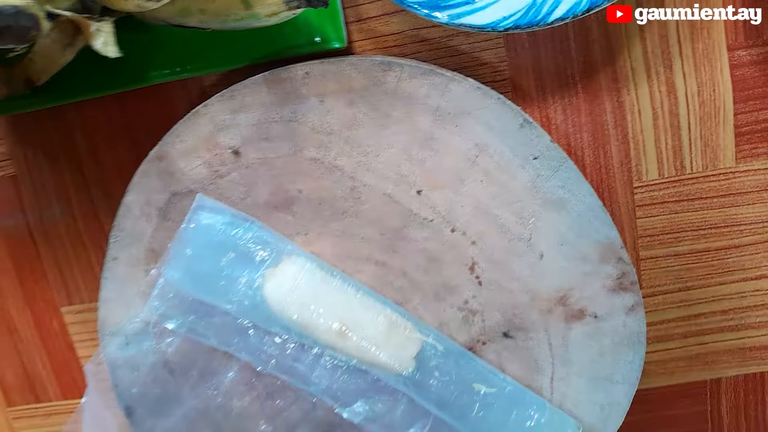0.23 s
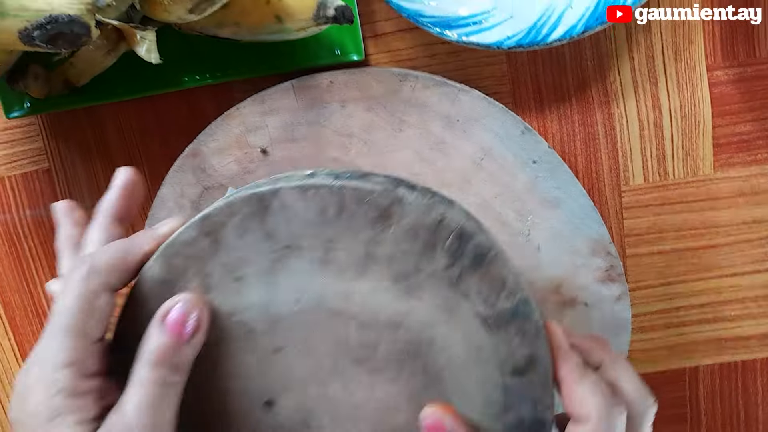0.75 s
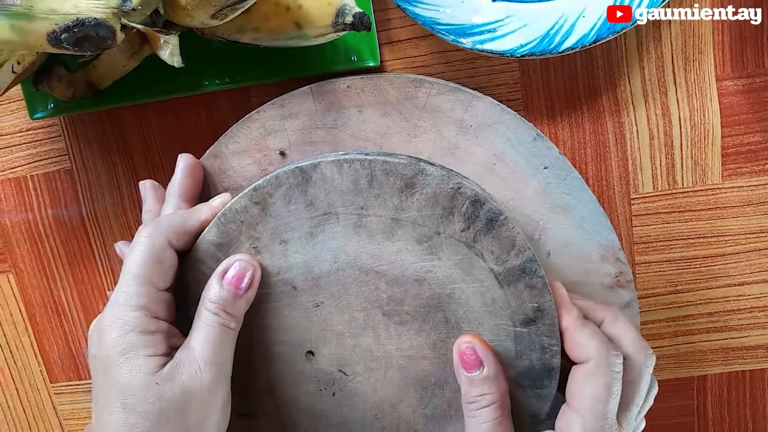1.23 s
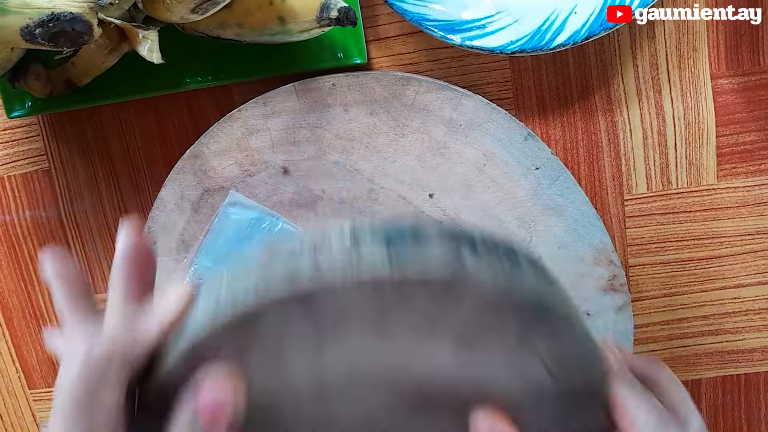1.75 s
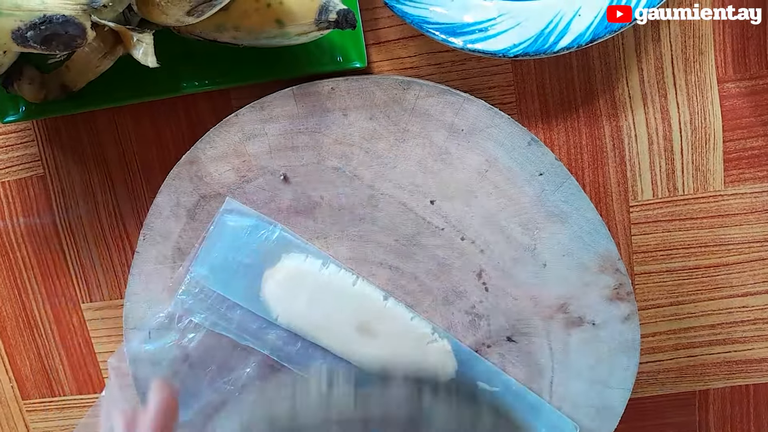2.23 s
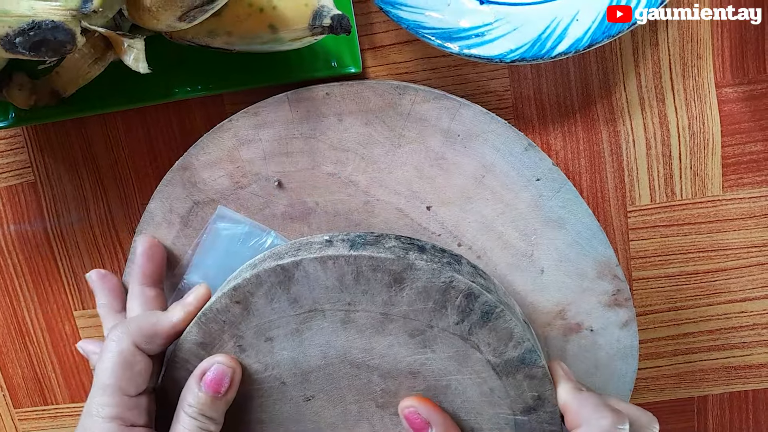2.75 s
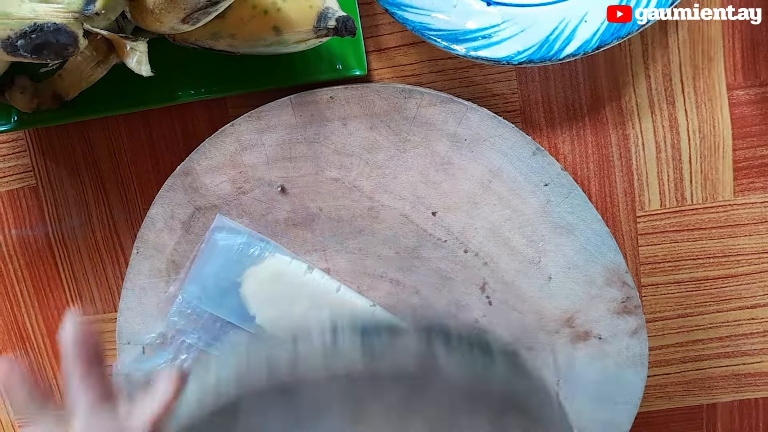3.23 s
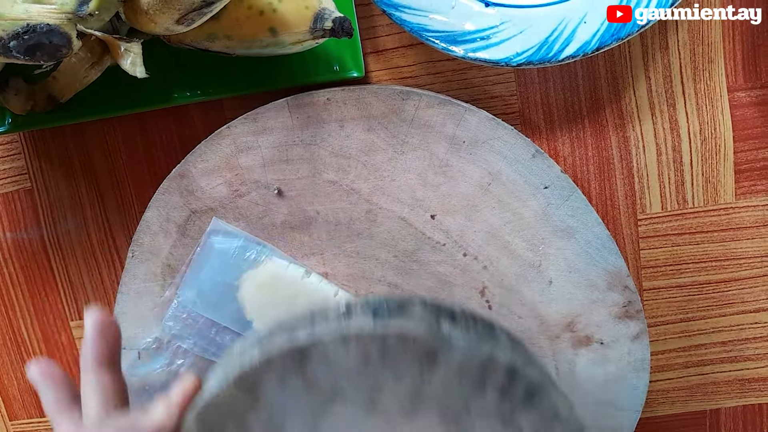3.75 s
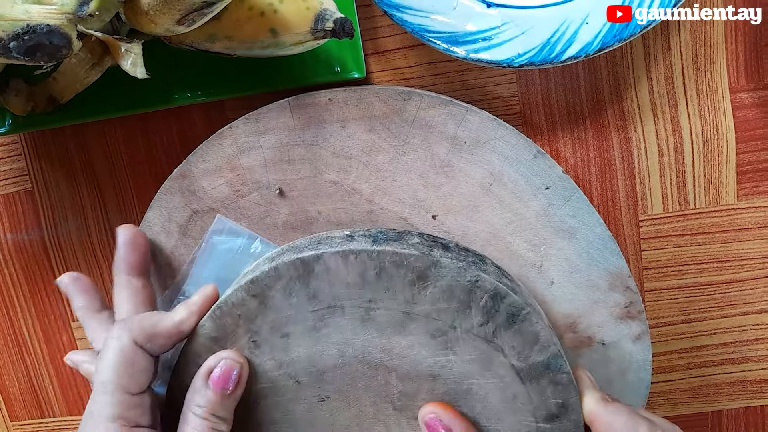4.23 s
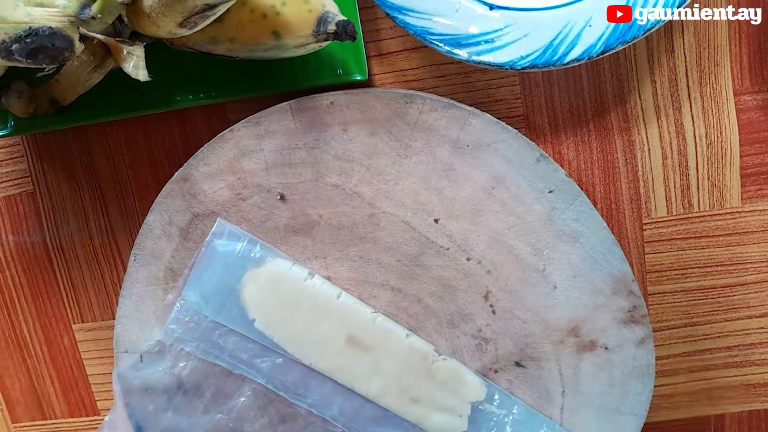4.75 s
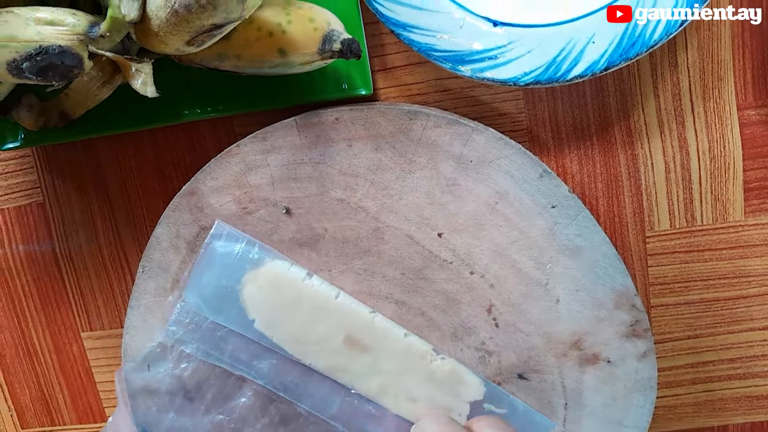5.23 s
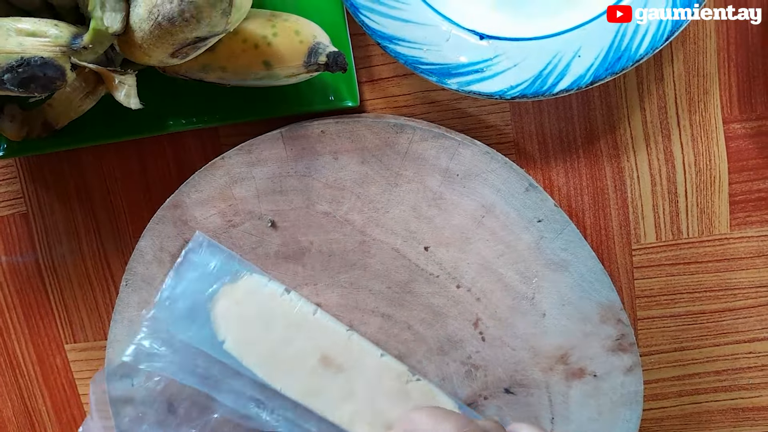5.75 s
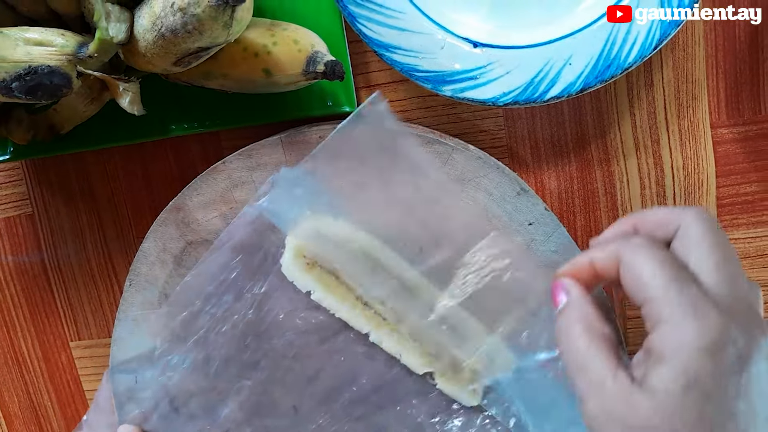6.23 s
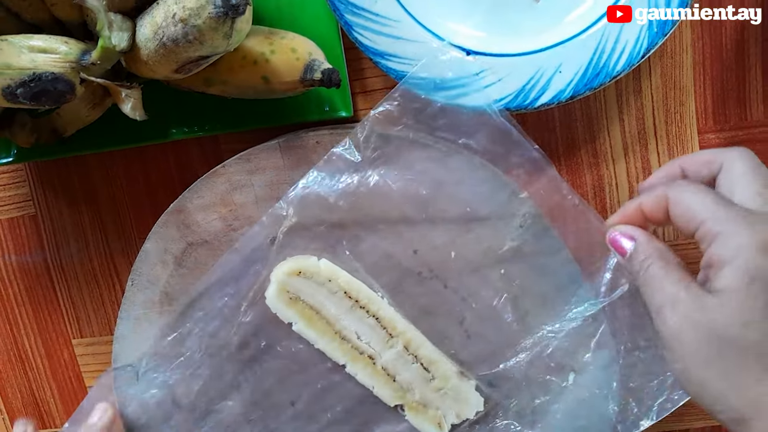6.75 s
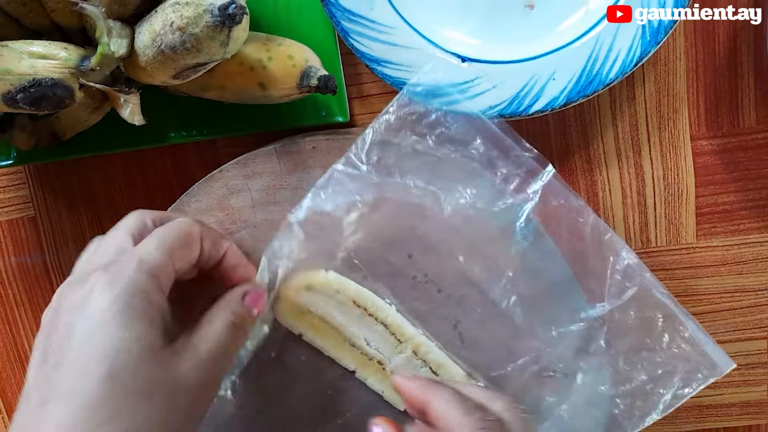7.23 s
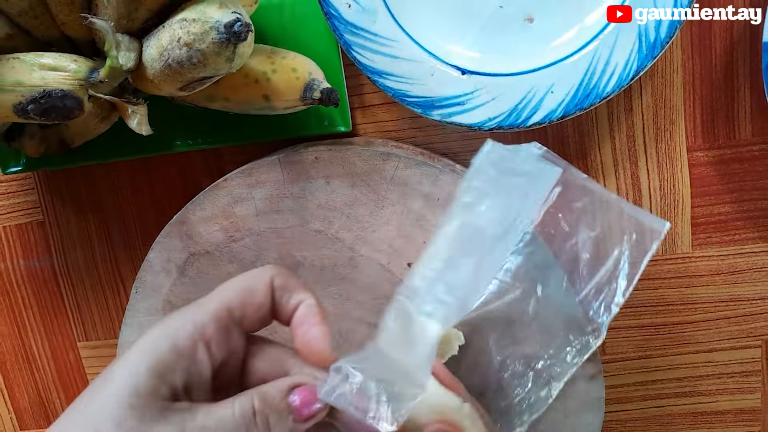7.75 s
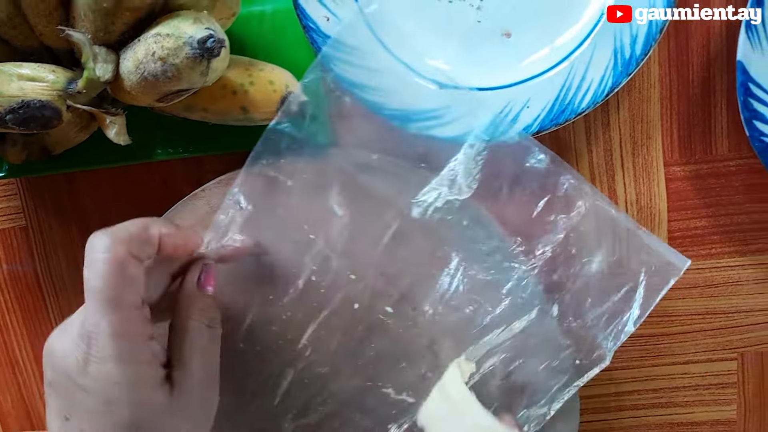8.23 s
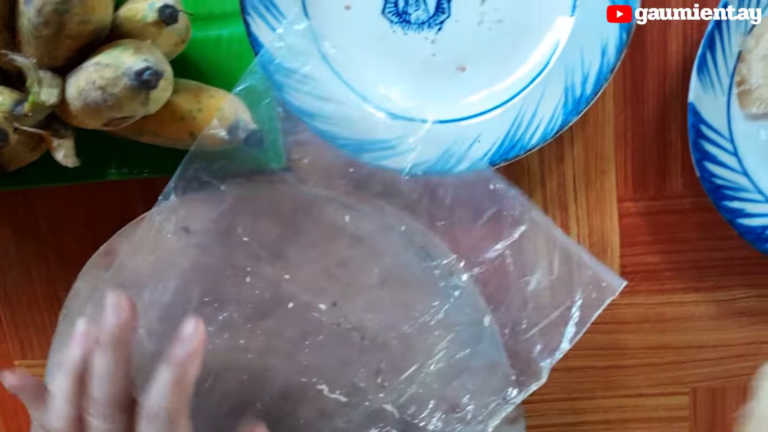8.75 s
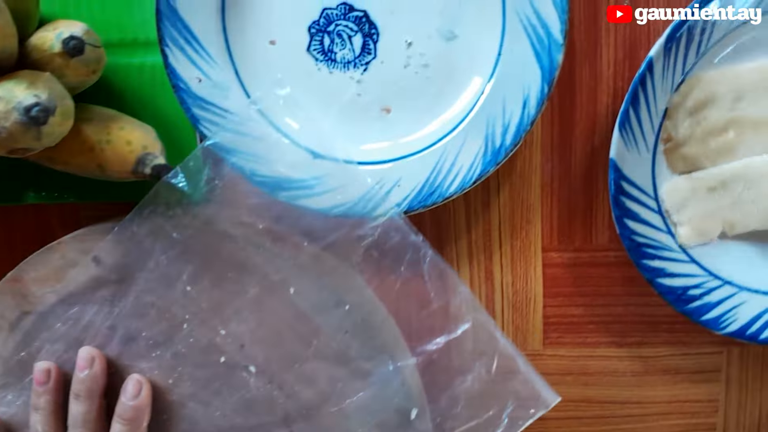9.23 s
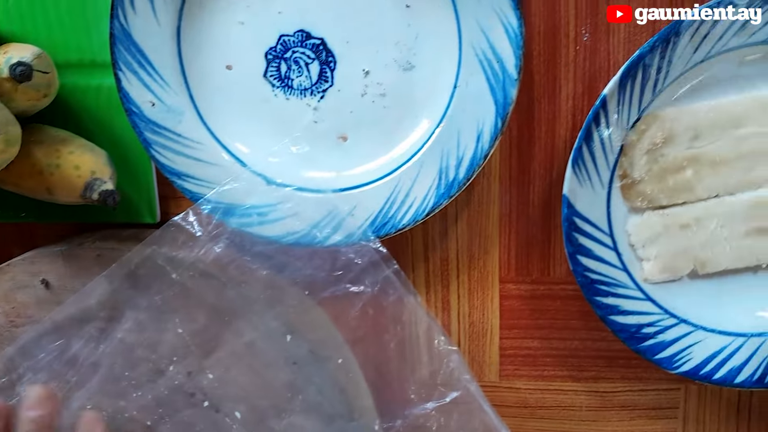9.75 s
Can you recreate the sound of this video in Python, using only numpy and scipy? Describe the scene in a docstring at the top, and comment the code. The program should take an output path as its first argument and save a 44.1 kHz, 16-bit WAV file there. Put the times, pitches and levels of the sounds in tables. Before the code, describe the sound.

Near-silent room air with a far bird's thin rising whistle. Three soft presses of a board on a wrapped banana give dull bumps, sparse plastic ticks and small wet squelches. Then the board is set down with one startlingly loud, dry wood clack, rocking briefly. Bright plastic film crackles in irregular bursts as hands open and peel it, and finally almost nothing remains. Close, dry stereo pickup with short room echo.

```python
"""A kitchen floor, two microphones close by: a banana lies in a thin plastic sheet between two wooden boards.
First come light taps and creases, modelled as short noise bursts; noise swelling through a resonance is the
plastic rubbing, and far outside a bird repeats a thin rising whistle. The upper board presses three times, in
showers of clicks, thuds and wet pops, then lands with a knock of ringing modes that overloads the converter.
Last the sheet is folded open and peeled off the fruit, crinkling, over quiet coloured noise for the air."""
import sys
import numpy as np
from scipy import signal
from scipy.fft import rfft, irfft, next_fast_len
from scipy.io import wavfile
from scipy.ndimage import uniform_filter1d

SR = 44100
rng = np.random.default_rng(int(sys.argv[2]) if len(sys.argv) > 2 else 0)


def bounce(signal):
    """Save signal as a 16-bit WAV file at the path given by the first command-line argument."""
    frames = np.transpose(np.atleast_2d(signal))
    limited = np.clip(frames, -1, 1)
    pcm = np.round(limited * 32767).astype(np.int16)
    wavfile.write(sys.argv[1], SR, pcm)


N = 440558

# Levels are relative: each source still passes through its own gains below.
# still air of the kitchen: (frequency [Hz], level per Hz [dB])
AIR_SPECTRUM = [(25, -27), (62, -5), (87, -12), (175, -9.5), (300, -17), (420, -24.5), (900, -32),
                (2000, -35), (5500, -40.5), (10500, -41), (12500, -38), (16000, -41)]
# how alike noise is at the two microphones: (frequency [Hz], left-right correlation [0-1])
MIC_LIKENESS = [(100, 0.71), (300, .8), (700, 0.45), (1200, 0.25), (2200, .25), (5000, 0.15)]
# echoes off the kitchen walls: (frequency [Hz], decay by 60 dB [s])
KITCHEN_DECAY = [(120, 0.19), (500, 0.24), (2000, 0.2), (6000, 0.15), (15000, 0.2)]
# dull thud of boards and fruit: (frequency [Hz], level per Hz [dB])
THUD_SPECTRUM = [(40, -15.5), (90, -6), (160, 4.5), (270, -3), (420, -16), (800, -40.5), (4000, -78)]
# the board presses the fruit:
# (touch [s], lying flat [s], lifting off [s], crackle level [dB], ring of the trapped fold [Hz])
BOARD_PRESSES = [(1.02, 1.18, 1.645, -47.2, 1750), (2.57, 2.77, 3.16, -46, 1850),
                 (4.01, 4.185, 4.328, -47.2, 2500)]
# hands move the sheet:
# (start [s], end [s], level halfway [dB], swell from start to end [dB], ring of the flexing fold [Hz])
HAND_RUSTLES = [(5.429, 5.5, -57.5, 0, 3204), (5.66, 6.09, -49, 4, 2500), (6.07, 6.543, -38.6, 12, 2800),
                (6.626, 6.856, -54, -8.5, 1370), (7.178, 7.353, -38, 12, 2620),
                (7.41, 7.655, -36.5, -0.5, 1470), (7.685, 7.76, -44, 8, 1980),
                (7.885, 8.11, -37.5, -9.5, 1430), (8.14, 8.577, -52.5, 4, 2120),
                (8.89, 8.953, -46, -10, 1780)]
# crisp plastic: (frequency [Hz], level per Hz [dB])
SHEET_SPECTRUM = [(200, -9), (500, 3.5), (900, -3.5), (2700, -8.5), (6500, -13.5), (9000, -16.5),
                  (16000, -20.5)]
# loudest creases snapping through: (time [s], peak level [dB], ring of the buckling facet [Hz])
CREASE_SNAPS = [(0.0214, -32.5, 3050), (1.1372, -29.5, 1680), (1.1648, -24.5, 1920), (1.6769, -23, 1100),
                (2.7082, -23, 1310), (3.2326, -23, 1230), (3.2591, -20, 1790), (4.1119, -24.5, 2220),
                (4.353, -26, 3900), (4.394, -23.5, 1990), (5.7394, -28, 2540), (6.0763, -15, 2880),
                (6.2115, -30, 3030), (6.3012, -16, 3960), (6.3171, -12, 3020), (6.3989, -18.5, 2800),
                (6.4208, -17, 3780), (6.4343, -10, 4000), (6.499, -21, 4290), (6.5303, -21, 4520),
                (6.8175, -31, 2750), (7.1508, -27.5, 7750), (7.1732, -22.5, 5830), (7.1894, -19, 3300),
                (7.214, -16.5, 5110), (7.226, -19, 3220), (7.2659, -13, 5360), (7.2813, -12, 8850),
                (7.3379, -18.5, 2710), (7.3795, -28, 3200), (7.5276, -19.5, 2320), (7.554, -16, 2700),
                (7.6147, -16.5, 2720), (7.6812, -24, 2600), (7.697, -19.5, 3000), (7.739, -17, 4140),
                (7.814, -12, 5000), (7.8449, -20, 3100), (7.887, -24, 2420), (7.9148, -17.5, 2740),
                (8.0643, -15, 1990), (8.1556, -16.5, 2070), (8.234, -25.5, 1900), (8.3918, -30.5, 2770),
                (8.903, -26, 2999), (9.715, -24.5, 13000)]
# film ringing over the air beneath it: (frequency [Hz], width [Hz], level [dB])
FILM_RINGS = [(892, 190, -1.5), (2840, 380, -4)]
# dry blows on the boards, light taps to the landing: (time [s], peak level [dB], upper edge [Hz])
BOARD_KNOCKS = [(.021, -25.5, 1080), (0.055, -27.5, 1090), (4.018, -22, 142), (5.1896, -6, 500),
                (5.206, -5.5, 540), (5.541, -14.5, 420), (5.5497, 14, 2596), (5.5587, 7.5, 1000)]
# modes of the board on the floor: (frequency [Hz], level [dB])
BOARD_MODES = [(114, -12), (150, -4.5), (234, -2.5), (295, -10), (373, -5.5), (414, -12), (501, 2),
               (605, -14), (899, -1), (1011, -6), (1167, -13.5), (1421, 0.5), (1594, -12), (2252, -7)]
# noisy clack of wood on wood: (frequency [Hz], level per Hz [dB])
CLACK_SPECTRUM = [(80, -13.5), (400, 4.5), (1100, -5.5), (3000, -9.0), (12000, -17)]
# smooth rubbing and hissing of the plastic as it drags, peels or slides:
# (start [s], end [s], level [dB], ring [Hz], ring share [dB], treble share [dB])
SHEET_RUBS = [(0.309, 0.542, -48, 3970, -10, -1.5), (0.459, 0.667, -62, 4500, 7, -1),
              (3.199, 3.564, -53, 1660, -1, -5), (5.18, 5.316, -56.5, 3000, -12, 1.5),
              (6.198, 6.663, -42.5, 700, -15, -17), (6.571, 6.92, -53.5, 1065, 13, -16),
              (7.382, 8.2, -47, 840, 1, -19), (8.885, 9.12, -56.5, 3800, -8, 3.5),
              (9.049, 9.724, -69, 8400, -2, 7.5)]
# bird calls: (time [s], level [dB])
BIRD_CALLS = [(0.771, -57), (2.248, -54.5), (4.032, -52.5), (6.619, -56.5), (9.146, -55)]
# shape of one call: (time after its start [s], pitch before the waver [Hz], level [dB])
CALL_SHAPE = [(0, 4070, -9.5), (.045, 4690, 2.5), (0.085, 5320, 7.5), (.15, 6350, -2.5), (.19, 6500, -8)]
# soft bumps of board or hand: (time [s], thud level [dB])
SOFT_BUMPS = [(1.168, -36.5), (1.662, -22), (1.752, -33), (2.826, -28), (3.18, -25), (3.258, -27.5),
              (4.339, -24), (4.415, -26), (6.082, -24.5)]
# the fruit gives way in wet pops: (time [s], gap between pops [s], first level [dB], growth per pop [dB])
FRUIT_SQUASHES = [(1.443, 0.024, -30, 0.3), (2.901, 0.03, -35.5, 1.44), (4.155, 0.028, -33.5, -9)]
# wet squelch of the fruit: (frequency [Hz], level per Hz [dB])
SQUELCH_SPECTRUM = [(200, -29), (550, 0.5), (720, -3.5), (1050, -3), (1450, -15), (3000, -20), (6000, -37)]

AIR_DB = -54
EDGE_HZ = 15950  # upper band limit
# treble share at a middling facet, and its change with pitch: smaller facets and folds are brighter
FACET_HZ = 2590
SNAP_TREBLE_DB, SNAP_DB_PER_OCTAVE = -4, 6
RUSTLE_TREBLE_DB, RUSTLE_DB_PER_OCTAVE = -7.5, 2
# under a press: crackle grows as the board comes down, sinks under the load, unsticks at the lift
LAY_SWELL_DB, LOADED_DB = 3, -10.5
LIFT_S, LIFT_DB = 0.1, 3
# rumble of weight building up on the boards
LEAN_DB, LEAN_SWELL_DB, LEAN_RELEASE_S = -42.5, 9.5, 0.56
# faint rumble of handling, until the hands come to rest
HANDS_DB, HANDS_REST_S, HANDS_FADE_DB_PER_S = -55, 8.3, 14.5
# the landed board rocks: each rock comes sooner and weaker
ROCK_START_S, ROCK_DB, ROCK_EDGE_HZ = 5.578, 0, 560
ROCK_GAP_S, ROCK_SHRINK, ROCK_LOSS_DB = 0.016, 0.5, 3.5


def gain_of(db):
    """Decibels to amplitude."""
    return 10 ** (np.asarray(db) / 20)


def evened(x):
    """Scales to rms 1."""
    return x / np.sqrt(np.mean(x ** 2) + 1e-20)


def peaked(x):
    """Scales so that the crest of a short burst is about 1."""
    power = uniform_filter1d((x ** 2).mean(0), size=24)
    return x / np.sqrt(2 * power.max() + 1e-20)


def read(points, hz):
    """Reads a table on a log-frequency axis."""
    f, value = np.transpose(points)
    return np.interp(np.log(hz + 1), np.log(f + 1), value)


def add(mix, s, sound):
    """Adds a stereo sound at time s, cut off at the end of the scene."""
    start = max(round(s * SR), 0)
    part = mix[:, start:][:, :sound.shape[1]]
    part += sound[:, :part.shape[1]]


def cut(x, hz, kind, order=2):
    """Low-pass or high-pass."""
    sos = signal.butter(order, np.clip(hz, 10, SR * .48), kind, fs=SR, output="sos")
    return signal.sosfilt(sos, x)


def ring(x, hz, width):
    """A resonance of gain 1 at its centre."""
    hz = min(hz, SR * .45)
    return signal.lfilter(*signal.iirpeak(hz, hz / width, fs=SR), x)


def noise(spectrum, size):
    """Coloured noise at two microphones, more alike in the bass than in the treble."""
    hz = np.fft.rfftfreq(size, 1 / SR)
    shared, apart = rfft(rng.standard_normal((2, size)))
    same = np.clip(read(MIC_LIKENESS, hz), 0, 1)
    mid, side = np.sqrt(1 + same) * shared, np.sqrt(1 - same) * apart
    left_right = np.array([mid + side, mid - side])
    return evened(irfft(left_right * gain_of(read(spectrum, hz)), size))


def burst(spectrum, rise, t60, size=4096):
    """Many close modes struck at once: noise that rises and dies away."""
    t = np.arange(size) / SR
    envelope = (1 - np.exp(-t / rise)) * gain_of(-60 * t / t60)
    return peaked(noise(spectrum, size) * envelope)


def level(points):
    """A dB curve over time as a gain for the whole scene, -120 dB outside its span."""
    times, db = np.transpose(points)
    return gain_of(np.interp(np.arange(N) / SR, times, db, -120, -120))


def fold(x, hz, treble_db, ring_db, width):
    """Colours crackle by the size of the fold: a ring, little below it, and fizz on top."""
    body = cut(x, max(6000, hz), "low", order=3)
    body = evened(cut(body, .5 * hz, "high"))
    body = evened(body + gain_of(ring_db) * evened(ring(x, hz, width * hz)))
    fizz = evened(cut(x, max(6000, hz * 0.81), "high", order=3))
    return body + gain_of(treble_db) * fizz


def still_air():
    """The quiet of the place: steady coloured noise."""
    return gain_of(AIR_DB) * noise(AIR_SPECTRUM, N)


def kitchen(x, delay=0.0074):
    """Wall echoes: noise that builds up over the delay, each band dying at its own speed."""
    flat = noise([(20, 0), (20000, 0)], size=SR // 2)
    hz, t, z = signal.stft(flat, SR, nperseg=256)
    decay = gain_of(-60 * t / read(KITCHEN_DECAY, hz)[:, None])
    tail = signal.istft(z * decay, SR, nperseg=256)[1]
    tail *= np.minimum(np.arange(tail.shape[1]) / SR / delay, 1) ** 2
    return signal.fftconvolve(x, tail / np.linalg.norm(tail[0]), axes=1)[:, :N]


def leaning(let_go_db=-24, tug_db=-10):
    """Weight builds through each press and lets go after the lift; handling and tugs rumble too."""
    resting = np.maximum(np.arange(N) / SR - HANDS_REST_S, 0)
    weight = gain_of(HANDS_DB - HANDS_FADE_DB_PER_S * resting)
    for touch, _, lift, _, _ in BOARD_PRESSES:
        free = lift + LIFT_S
        press = [(touch, LEAN_DB - LEAN_SWELL_DB), (lift, LEAN_DB),
                 (free, LEAN_DB), (free + LEAN_RELEASE_S, LEAN_DB + let_go_db)]
        weight = np.maximum(weight, level(press))
    for start, end, db, _, _ in HAND_RUSTLES:
        tug = [(start, db + tug_db), (end, db + tug_db)]
        weight = np.maximum(weight, level(tug))
    return noise(THUD_SPECTRUM, N) * weight


def sheet(direct_db=-2.5, sideways=1.0):
    """The film rings; the plastic sounds fuller near 4.9 kHz on the left, near 8.4 kHz on the right."""
    out = gain_of(direct_db) * (snaps() + rubs() + rustle())
    out = out + sum(gain_of(db) * ring(out, hz, width) for hz, width, db in FILM_RINGS)
    return out + sideways * np.array([ring(out[0], 4880, 2430), ring(out[1], 8350, 3900)])


def snaps(snap_db=-0.72, slowest_rise=0.00055, flutter_db=-21, strain_db=-17, strain_t60=0.02):
    """A crease strains for a moment, buckles, and the sheet around it flutters briefly."""
    out = np.zeros((2, N))
    for s, db, hz in CREASE_SNAPS:
        # the strain is a decaying burst turned backwards, ending at the snap
        strain = burst(SHEET_SPECTRUM, rise=0.00022, t60=strain_t60, size=1024)[:, ::-1]
        buckle = burst(SHEET_SPECTRUM, rise=slowest_rise * rng.uniform(0.099, 1), t60=0.016)
        flutter = burst(SHEET_SPECTRUM, rise=0.0072, t60=0.037)
        crack = buckle + gain_of(flutter_db) * flutter
        treble = SNAP_TREBLE_DB + SNAP_DB_PER_OCTAVE * np.log2(hz / FACET_HZ)
        snap = np.hstack([gain_of(strain_db) * strain, crack])
        snap = fold(snap, hz, treble, ring_db=-1, width=0.051)
        add(out, s - strain.shape[1] / SR, gain_of(db + snap_db) * peaked(snap))
    return out


def knocks(clack_db=-8, push_db=0, bass_t60=0.16, damping=.45, skew_hz=300, rattle_db=-34.0):
    """Each blow pushes the floor, rings the board and shakes the sheet; soft contact omits high modes."""
    out, t = np.zeros((2, N)), np.arange(SR // 2) / SR
    modes = 0
    for hz, db in BOARD_MODES:
        t60 = bass_t60 * (BOARD_MODES[0][0] / hz) ** damping
        # high modes reach the microphones out of step
        lag = min((hz / skew_hz) ** 2, np.pi / 2) * np.array([[.5], [-.5]])
        modes = modes + gain_of(db - 60 * t / t60) * np.sin(2 * np.pi * hz * t - lag)
    for s, db, edge_hz in [*BOARD_KNOCKS, *rocking()]:
        clack = burst(CLACK_SPECTRUM, rise=0.0004, t60=0.083, size=len(t))
        phase = t * edge_hz * np.pi
        push = gain_of(push_db) * phase * (2 - phase) * np.exp(-phase)  # the brief contact itself
        blow = peaked(modes) + gain_of(clack_db) * clack + push
        blow = cut(blow, edge_hz, "low", order=4)
        blow = cut(blow, 70, "high", order=3)  # keeps the knock free of deep rumble
        rattle = burst(SHEET_SPECTRUM, rise=.001, t60=0.084, size=len(t))
        add(out, s, gain_of(db) * (blow / abs(blow).max() + gain_of(rattle_db) * rattle))
    return out


def rubs():
    """Plastic drags, peels or slides: a smooth hiss that swells and fades, with a ring and a treble share."""
    out = np.zeros((2, N))
    for start, end, db, hz, ring_db, treble in SHEET_RUBS:
        hiss = fold(noise(SHEET_SPECTRUM, SR), hz, treble, ring_db=ring_db, width=0.1)
        hiss = hiss[:, :int((end - start) * SR)]
        add(out, start, gain_of(db) * hiss * np.hanning(hiss.shape[1]))
    return out


def bird(waver=0.0424, scatter_t60=0.43):
    """A far whistle slides upward, wavering, and arrives only as scattered echoes."""
    out, (times, pitch, loud) = np.zeros((2, N)), np.transpose(CALL_SHAPE)
    t = np.arange(0, times[-1], 1 / SR)
    for s, db in BIRD_CALLS:
        wobble = evened(uniform_filter1d(rng.standard_normal(len(t)), size=60))
        hz = np.interp(t, times, pitch) * (1 + waver * wobble)
        call = gain_of(db + np.interp(t, times, loud)) * np.sin(2 * np.pi * np.cumsum(hz) / SR)
        echoes = rng.standard_normal((2, len(t))) * gain_of(-60 * t / scatter_t60)
        add(out, s, signal.fftconvolve(call[None], echoes / np.linalg.norm(echoes[0]), axes=1))
    return out


def board_moves():
    """Each press moves the sheet three ways: flattening it, creeping under the load, letting it go."""
    for touch, flat, lift, db, hz in BOARD_PRESSES:
        yield touch, flat, db, LAY_SWELL_DB, hz
        yield flat, lift, db + LOADED_DB, 0, FACET_HZ
        yield lift, lift + LIFT_S, db + LIFT_DB, 0, hz


def crackle(size, hz, per_s=90, spread_db=8.0, grain=0.0014, scatter=0.51, facet_db=0, count=7):
    """Several facets, each with its own pitch about hz, give showers of tiny snaps of unequal size."""
    hiss, out = noise(SHEET_SPECTRUM, next_fast_len(size))[:, :size], 0
    for _ in range(count):
        chance, strength = rng.random((2, size))
        pitch = hz * 2 ** (scatter * rng.standard_normal())  # scatter in octaves
        clicks = (chance < per_s / SR) * gain_of(spread_db * np.minimum(-np.log(1 - strength), 3))
        # the power of each click dies away over the grain time [s]
        power = signal.lfilter([1], [1, -np.exp(-1 / (grain * SR))], clicks ** 2)
        power = uniform_filter1d(power, size=50)
        facet = hiss + gain_of(facet_db) * evened(ring(hiss, pitch, .12 * pitch))
        out = out + facet * np.sqrt(abs(power))
    return out


def rustle(fade=.02):
    """Each movement by hand or board swells, fades or holds level as one fold crackles through."""
    out = np.zeros((2, N))
    for start, end, db, swell_db, hz in [*HAND_RUSTLES, *board_moves()]:
        size = int((end - start + 2 * fade) * SR)
        treble = RUSTLE_TREBLE_DB + RUSTLE_DB_PER_OCTAVE * np.log2(hz / FACET_HZ)
        shower = crackle(size=24000, hz=hz)[:, :size]
        shower = fold(shower, hz, treble, ring_db=-21, width=0.1)
        effort = gain_of(db + swell_db * np.linspace(-.5, .5, size))
        edges = signal.windows.tukey(size, 2 * 2 * fade * SR / size)
        add(out, start - fade, effort * shower * edges)
    return out


def pressing(pop_thud_db=5.5, bump_squelch_db=-15, count=4):
    """The board thuds through the soft fruit, which gives way in small wet pops."""
    out = np.zeros((2, N))
    hits = [(s, db, db + bump_squelch_db) for s, db in SOFT_BUMPS]
    for first, gap, first_db, growth in FRUIT_SQUASHES:
        for k in range(count):
            pop_db = first_db + k * growth
            hits.append((first + k * gap, pop_db + pop_thud_db, pop_db))
    for s, thud_db, squelch_db in hits:
        add(out, s, gain_of(thud_db) * burst(THUD_SPECTRUM, rise=0.0021, t60=0.18, size=8192))
        add(out, s, gain_of(squelch_db) * burst(SQUELCH_SPECTRUM, rise=0.00088, t60=0.095))
    return out


def rocking(count=3):
    """The landed board rocks on its rim in ever quicker, weaker blows."""
    gaps = ROCK_GAP_S * ROCK_SHRINK ** np.arange(count - 1)
    times = ROCK_START_S + np.cumsum([0, *gaps])
    return [(s, ROCK_DB - k * ROCK_LOSS_DB, ROCK_EDGE_HZ) for k, s in enumerate(times)]


def scene(sheet_room_db=-10, wood_room_db=-22):
    """Plastic and wood close by, with the room, the bird and still air behind."""
    plastic = sheet()
    wood = leaning() + knocks() + pressing()
    room = kitchen(gain_of(sheet_room_db) * plastic + gain_of(wood_room_db) * wood)
    return plastic + wood + room + bird() + still_air()


def record(dry):
    """The converter clips at full scale; then the band limit."""
    clipped = np.clip(dry, -1, 1)
    band_limit = signal.firwin(511, EDGE_HZ, window=("kaiser", 9), fs=SR)
    return signal.oaconvolve(clipped, band_limit[None], "same")


dry = scene()
out = record(dry)
bounce(out)
```